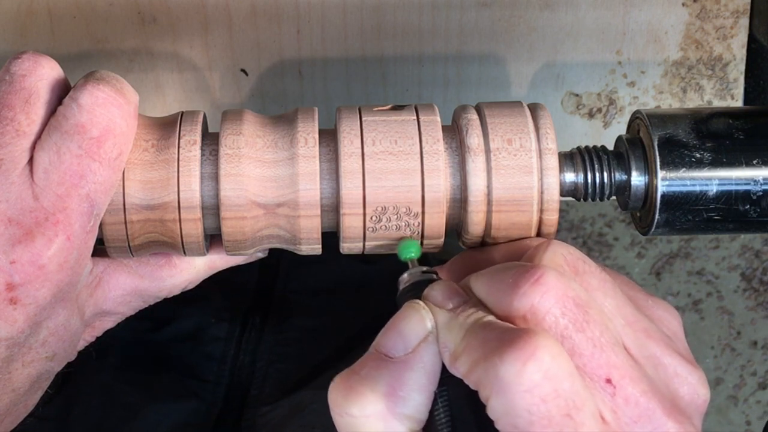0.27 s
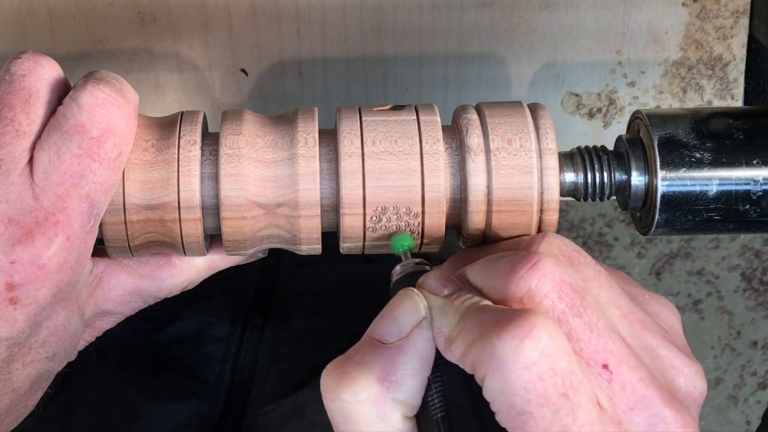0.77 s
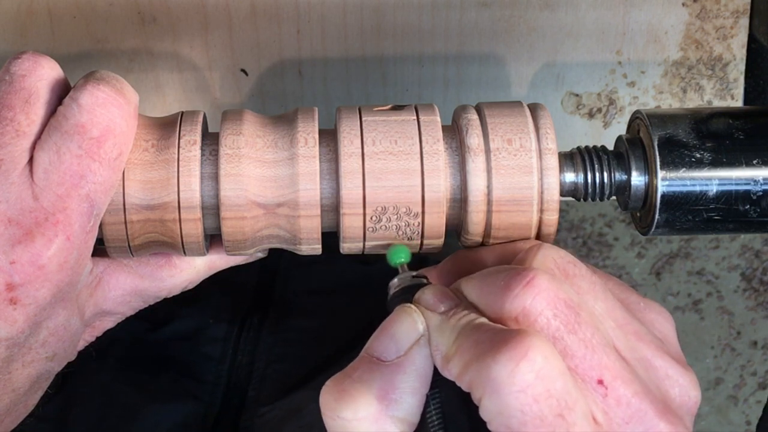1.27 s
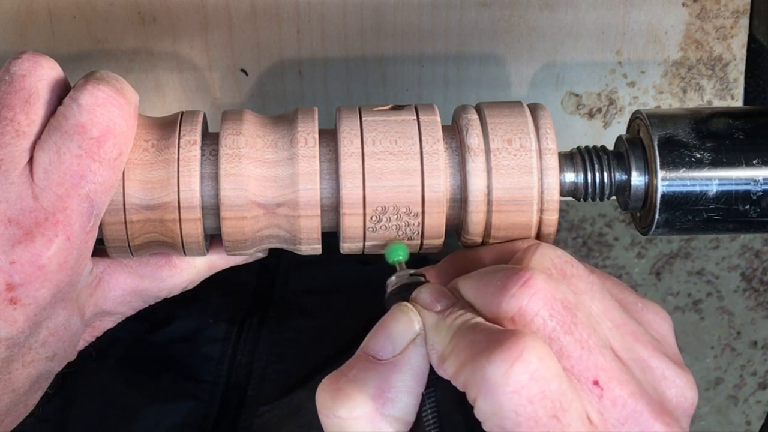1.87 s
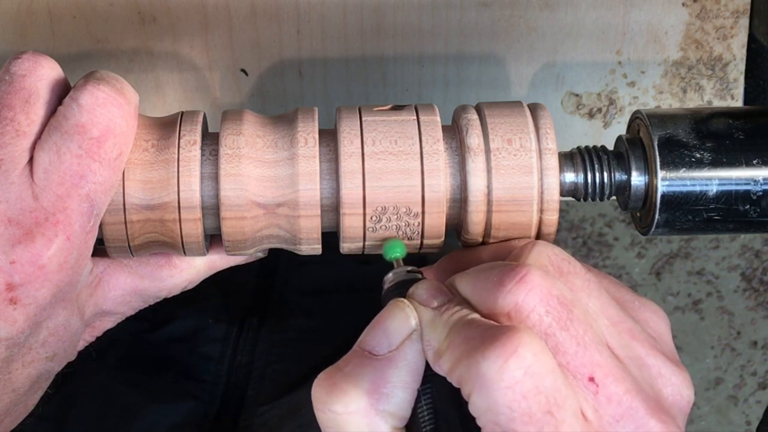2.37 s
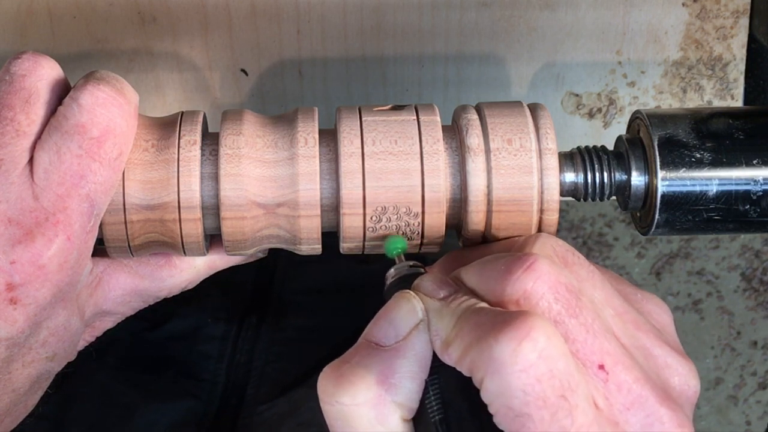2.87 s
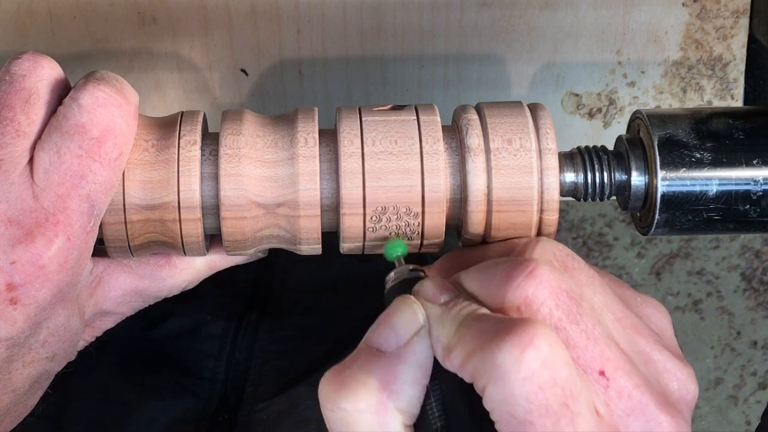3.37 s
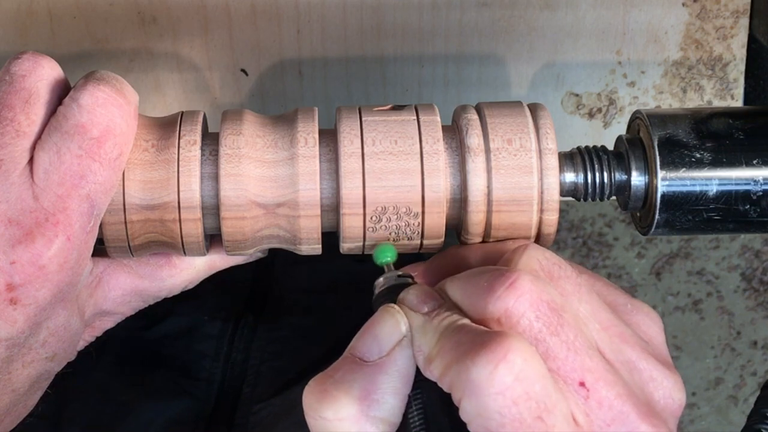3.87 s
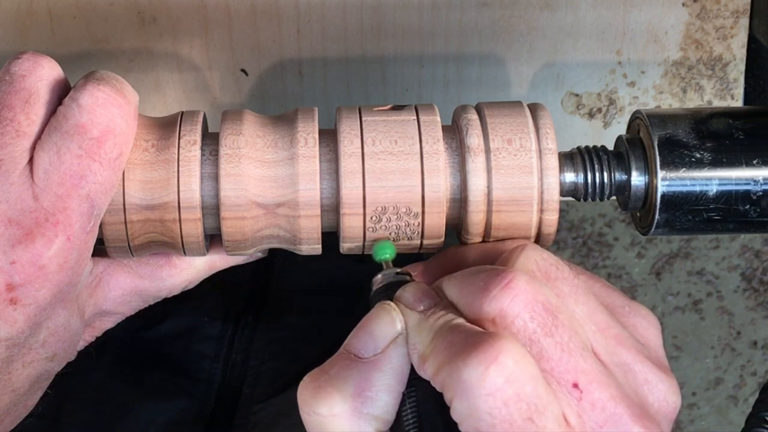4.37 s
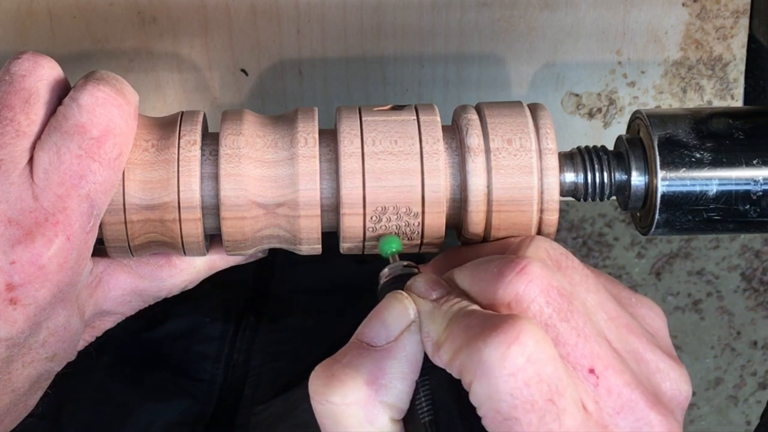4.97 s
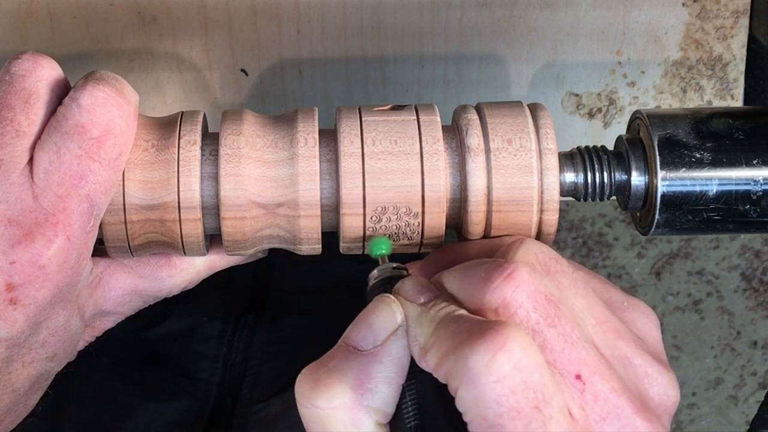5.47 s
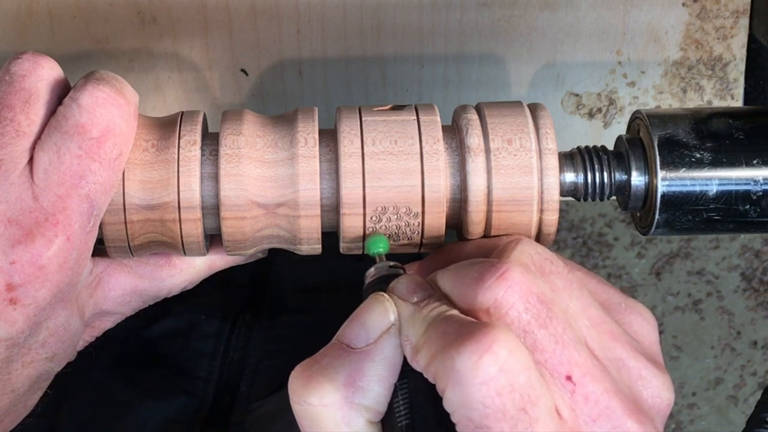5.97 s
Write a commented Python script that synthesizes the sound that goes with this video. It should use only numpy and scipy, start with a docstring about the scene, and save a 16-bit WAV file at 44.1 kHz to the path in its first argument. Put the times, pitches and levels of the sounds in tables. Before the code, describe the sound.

A small rotary carving tool whines at high speed, dipping in pitch and rasping each time it presses into wood.

```python
"""Rotary burr on wood

A flex-shaft tool spins a ball burr at about 39000 rpm in a workshop. Seven times it is pressed into
turned wood: drag slows the shaft, the burr chatters and rasps, and the speed recovers. Shaft harmonics
and inharmonic bearing tones whine over the rush of the cable and the motor's air; the room hums faintly."""
import sys
import numpy as np
from scipy import signal
from scipy.fft import rfft, irfft, next_fast_len
from scipy.io import wavfile
from scipy.ndimage import map_coordinates

SR = 44100
rng = np.random.default_rng(int(sys.argv[2]) if len(sys.argv) > 2 else 0)


def output_pcm(signal):
    """Save a mono or channel-first signal as 16-bit PCM at the path in sys.argv[1].

    Samples are clipped to [-1, 1] before scaling.
    """
    pcm = np.clip(np.atleast_2d(signal).T, -1, 1) * 32767
    wavfile.write(sys.argv[1], SR, np.round(pcm).astype(np.int16))


N = 274743
TIME = np.arange(N) / SR

# Presses into the wood; drag is the steady loss of speed, and a rise power under 1 is abrupt.
# touch_s, lift_s, peak_drag_hz, rise_power, chatter_db, rebound_db
PRESSES = [(0.005, 0.163, 101.9, 0.15, 5.5, -2), (0.735, 0.996, 156.9, 1.42, 10.5, 11.5),
           (2.279, 2.489, 137.8, 0.7, 5.5, 6), (2.955, 3.234, 154.1, 1.55, 14.5, 9),
           (4.153, 4.476, 136.7, 1.31, -3, 0), (4.899, 5.159, 152.9, 1.38, 6, 10.5),
           (5.779, 6.029, 169.1, 1.19, 3.5, 12)]
FREE_HZ, START_HZ, FULL_DRAG_HZ = 652.5, 639, 110


def shaft(inertia_s=0.1718, release_s=0.038):
    """Rotational inertia: speed follows drag with a first-order lag. Load is 0 in air, 1 in a full cut."""
    drag = np.zeros(N)
    for touch_s, lift_s, peak_hz, power, *_ in PRESSES:
        rise = np.clip((TIME - touch_s) / (lift_s - touch_s), 0, 1) ** power
        drag += peak_hz * rise * np.exp(-np.maximum(TIME - lift_s, 0) / release_s)
    pole = np.exp(-1 / (SR * inertia_s))
    speed = FREE_HZ - signal.lfilter([1 - pole], [1, -pole], drag, zi=[FREE_HZ - START_HZ])[0]
    flutter = 0.28 * wobble(60) + 0.201 * wobble(7)  # the cable winds and unwinds slightly
    angle = 2 * np.pi * np.cumsum(speed + flutter) / SR
    return speed, angle, np.clip(drag / FULL_DRAG_HZ, 0, 1)


# Skips of the burr around each lift: offset_s
SKIPS = [-0.051, .016, 0.0595]


def burr(speed, angle, load, air_db=-36.5, pinned_db=-5.5, skip_db=-10):
    """Rotating imbalance: the off-centre burr drones; wood pins it, and it rebounds and skips on lifting."""
    db = air_db + 35 * np.log10(speed / FREE_HZ) + pinned_db * load
    for _, lift_s, *_, rebound_db in PRESSES:
        db += rebound_db * bump(lift_s, 0.032)
        db += skip_db * sum(bump(lift_s + offset_s, 0.0082) for offset_s in SKIPS)
    bounce = 1 + load * 0.42 * wobble(65)
    slip = load * 0.46 * wobble(60)
    return amp(db + 0.22 * wobble(5.1)) * bounce * tone(angle + slip)


# Shaft harmonics; an order is a multiple of the speed, and the seventh comes from the fan's blades.
# order, relative_level_db, cut_gain_db, graze_gain_db
HARMONICS = [(2, -54.5, 10.5, -1), (3, -44, 8, 3.5), (4, -48, 0, 2), (5, -55.5, 13.5, 2),
             (6, -43.5, 6.5, 5), (7, -38.0, 5, -0.3), (8, -51.5, 8.5, 5), (9, -49, 3.4, 5.4),
             (10, -42, 1.5, 1.5), (11, -51.5, 6, 3), (14, -45.7, 0.5, 2.5), (15, -59.5, 7.6, 3),
             (16, -57, 6, 2.0), (20, -55, -3.6, 2.3), (21, -54.2, 3, 4), (22, -60, 0, 1)]
# Squeals, swells and fades of single harmonics: centre_s, order, gain_db, half_length_s
FLARES = [(0.181, 6, 8, 0.027), (0.185, 2, 10, 0.044), (0.6, 14, -6, 0.14), (0.684, 10, 8, 0.29),
          (0.92, 7, 6.5, 0.037), (1.762, 14, -8, 0.15), (1.833, 3, -23, 0.41), (2.264, 6, 9.5, 0.038),
          (2.52, 4, 3, 0.044), (3.02, 10, 7, 0.21), (3.1, 5, 9, 0.033), (3.204, 7, 5.5, 0.038),
          (3.725, 20, 6, 0.31), (3.86, 10, -12, 0.38), (4.253, 4, 9.5, 0.048), (4.35, 14, 6.5, 0.05),
          (4.42, 10, 7, 0.042), (4.49, 16, 8, 0.05), (4.5, 4, 6.5, 0.051), (4.992, 3, 13, 0.052),
          (5.021, 5, 13, 0.038), (5.067, 8, 9.5, 0.08), (5.076, 10, 12, 0.033), (5.089, 15, 8, 0.07),
          (5.116, 9, 12.5, 0.07)]


def harmonics(speed, angle, load, base_db=-1.1):
    """Periodic forcing: whole multiples of the speed sound, most rising as the teeth graze and cut."""
    graze = sum(bump(touch_s + 0.022, 0.048) for touch_s, *_ in PRESSES)
    # Shortly before each lift the burr chatters twice a turn.
    chatter = [(lift_s - 0.07, 2, db, 0.035) for _, lift_s, _, _, db, _ in PRESSES]
    flares = [*FLARES, *chatter]
    out = np.zeros(N)
    for order, free_db, cut_db, graze_db in HARMONICS:
        flare_db = sum(db * bump(centre_s, half_s) for centre_s, k, db, half_s in flares if k == order)
        level_db = base_db + free_db + cut_db * load + graze_db * graze + flare_db
        out += partial(order, level_db, speed, angle, load)
    return out


# Resonances of the handpiece: centre_hz, width_hz, gain_db
HANDPIECE_MODES = [(1190, 160, 7.3), (2334, 54, 6.5), (2559, 140, 6.5), (3220, 78, 7.5), (4250, 184, -7),
                   (4456, 54, 2), (6250, 118, -4), (8310, 1770, 15), (8970, 280, -7), (9410, 210, 5.5)]


def partial(order, db, speed, angle, load, flicker_db=1.4):
    """Forced resonance: a tone swells and dips as it glides through the handpiece's response."""
    level_db = db + resonance_db(HANDPIECE_MODES, order * speed) + flicker_db * wobble(14)
    ragged_db = load * (2.5 * wobble(75) + 1.3 * wobble(35))
    jitter = 0.034 * order * wobble(140)  # shaft jitter blurs the high orders most
    return amp(level_db + ragged_db) * tone(order * angle + jitter)


# Envelope of the bearing's leading tone: time_s, level_db
WHINE_LEVELS = [(0, -39), (.18, -50), (.28, -34), (.46, -38), (.68, -31), (.92, -43), (1.2, -35),
                (1.75, -36.5), (1.95, -31), (2.27, -33.5), (2.75, -41), (3.3, -38), (3.48, -35.5),
                (4.7, -43.5), (5.2, -42), (5.38, -33.5), (5.8, -48), (5.96, -38), (6.22, -46)]


def bearing_whine(angle, order=10.578):
    """Rolling contact: the bearing sings unevenly at a non-integer multiple of the speed."""
    db = np.interp(TIME, *np.transpose(WHINE_LEVELS))
    return amp(db + 0.86 * wobble(9) + 0.37 * wobble(35)) * tone(order * angle + 0.085 * wobble(90))


# Further tones of the bearing balls: order
BALL_ORDERS = [5.078, 5.906, 11.406, 12.578, 16.07, 16.898, 21.57, 22.398, 22.812]
# Strength of each of those tones: relative_level_db
BALL_LEVELS = [-53.5, -49, -52, -58, -51.5, -49.5, -48, -49, -50]


def bearing_rattle(speed, angle, load, flaw_tones=20):
    """Inharmonic vibration: the balls ring, and flaws in the races scatter fleeting tones among them."""
    balls = sum(partial(order, db - 2.5, speed, angle, load, flicker_db=3.5)
                for order, db in zip(BALL_ORDERS, BALL_LEVELS))
    flaws = sum(amp(-59 + 5 * wobble(11)) * tone(order * angle)
                for order in rng.uniform(9, 23, flaw_tones))
    return balls + flaws


# Spectrum of the cable and cooling air: frequency_hz, relative_density_db
RUSH_SPECTRUM = [(250, -25.5), (600, -19), (900, -10), (1400, -5.5), (1900, -4.5), (3100, -5), (4900, -5.5),
                 (6000, 1.5), (7600, -2), (8900, 0), (10300, -10), (12000, -6), (14000, -7), (15700, -12.5)]
# Resonances of the cable's sheath: centre_hz, width_hz, gain_db
SHEATH_MODES = [(1744, 130, 6.5), (2110, 380, 12), (2560, 180, 5.5), (3440, 640, 4.5), (3994, 380, 8),
                (5800, 510, 0.5), (6500, 500, -0.5)]


def cable_and_air(speed, angle):
    """Friction and flow noise: both grow with speed, and the cable rubs its sheath harder once a turn."""
    db = -31.5 + 45 * np.log10(speed / speed.max()) + 0.34 * wobble(7.4) + 0.79 * wobble(250)
    return amp(db) * noise(RUSH_SPECTRUM, SHEATH_MODES) * unit(1 + 0.25 * np.sin(angle))


# Spectrum of the cut: frequency_hz, relative_density_db
RASP_SPECTRUM = [(300, -20), (1000, -10.5), (2200, -16), (3900, -0.5), (5000, -12), (6200, -0.5),
                 (7600, -1.5), (8600, -8), (9500, -1.5), (10600, -13), (13200, -4), (15700, -6)]


def rasp(angle, load, full_cut_db=-33):
    """Amplitude-modulated noise: the teeth tear off fibres once a turn, in uneven bites."""
    tearing = noise(RASP_SPECTRUM)
    bites = unit(amp(3.3 * np.sin(angle) + 0.95 * wobble(400) + 2.8 * wobble(50)))
    return amp(full_cut_db) * load * tearing * bites


# Tones of the teeth entering the wood: order
TOOTH_ORDERS = [22, 23, 24]


def whistles(speed, angle, load, delay_s=0.12):
    """Pitch follows rotation: the teeth whistle briefly on entry, falling as the shaft slows."""
    entry = sum(bump(touch_s + delay_s, 0.064) for touch_s, *_ in PRESSES)
    return entry * sum(partial(order, -47, speed, angle, load, flicker_db=3) for order in TOOTH_ORDERS)


# Catches of the burr in the grain: start_s, level_db
CATCHES = [(1.005, -45), (2.529, -36.5), (6.058, -33)]
# Modes of the wooden piece: pitch_hz, relative_level_db, t60_s
WOOD_MODES = [(480.3, -6.5, 0.13), (539, 1.5, 0.1), (1098, 3, 0.084)]


def knocks(attack_s=0.004):
    """Damped free vibration: each catch jolts the wood, whose modes decay exponentially."""
    out = np.zeros(N)
    for start_s, level_db in CATCHES:
        age = np.maximum(TIME - start_s, 0)
        ring = sum(amp(db - 60 * age / t60) * tone(2 * np.pi * hz * age) for hz, db, t60 in WOOD_MODES)
        out += amp(level_db) * ring * (1 - np.exp(-age / attack_s))
    return out


def walls(sound, t60_s=0.22, gap_s=0.004, low_cut_hz=1100):
    """Reverberation: a short diffuse tail of reflections smears the gliding partials."""
    t = np.arange(SR // 3) / SR
    tail = rng.standard_normal(len(t)) * amp(-60 * t / t60_s) * (t > gap_s)
    treble = filtered(sound, lambda hz: hz ** 2 / (hz ** 2 + low_cut_hz ** 2))
    return signal.fftconvolve(treble, tail / np.linalg.norm(tail))[:N]


# Tones of the room's hum: pitch_hz, level_db
HUM_TONES = [(56.5, -65), (102, -62), (175, -72)]
# Spectrum of the room's rumble: frequency_hz, relative_density_db
RUMBLE_SPECTRUM = [(20, -29), (38, -26), (50, 2), (60, -8.5), (78, -4.5), (100, -6.5), (135, -16.5),
                   (220, -25.5), (400, -21.5), (1000, -46)]


def workshop(rumble_db=-59):
    """Ambient noise floor: wavering hum tones stand over a low continuous spectrum."""
    hum = sum(amp(db + wobble(6.5)) * tone(2 * np.pi * hz * TIME + 0.57 * wobble(8))
              for hz, db in HUM_TONES)
    return hum + amp(rumble_db) * noise(RUMBLE_SPECTRUM)


def amp(db):
    """Decibels as an amplitude ratio."""
    return 10 ** (np.asarray(db) / 20)


def unit(x):
    """Normalisation to rms 1."""
    return x / np.sqrt(np.mean(x ** 2) + 1e-20)


def tone(phase):
    """A sinusoid of rms 1 with a random starting phase."""
    return np.sqrt(2) * np.sin(phase + rng.uniform(0, 2 * np.pi))


def bump(centre_s, half_s):
    """A Gaussian swell from 0 to 1 and back."""
    return np.exp(-((TIME - centre_s) / half_s) ** 2)


def wobble(rate_hz):
    """Smooth random modulation: a spline through rate_hz random values a second."""
    return map_coordinates(rng.standard_normal(int(N * rate_hz / SR) + 4), [TIME * rate_hz])


def filtered(x, response):
    """Zero-phase filtering: the spectrum times a frequency response."""
    size = next_fast_len(N + 8192)
    return irfft(rfft(x, size) * response(np.fft.rfftfreq(size, 1 / SR)), size)[..., :N]


def resonance_db(modes, hz):
    """The summed gain of Lorentzian peaks and dips."""
    return sum(db / (1 + (2 * (hz - centre) / width) ** 2) for centre, width, db in modes)


def noise(spectrum, modes=()):
    """Source and filter: white noise shaped by a broad spectrum and resonances, at rms 1."""
    knots_hz, knots_db = np.transpose(spectrum)

    def response(hz):
        return amp(np.interp(np.log(hz + 1), np.log(knots_hz), knots_db) + resonance_db(modes, hz))

    return unit(filtered(rng.standard_normal(N), response))


def scene():
    """Superposition: tool, reflections and room add, alike in both channels."""
    speed, angle, load = shaft()
    tool = burr(speed, angle, load) + bearing_whine(angle) + harmonics(speed, angle, load)
    tool += bearing_rattle(speed, angle, load) + cable_and_air(speed, angle)
    tool += rasp(angle, load) + whistles(speed, angle, load) + knocks()
    mix = tool + amp(-10.5) * walls(tool) + workshop()
    return np.array([mix, mix])


def record(dry, cutoff_hz=15750):
    """Band limiting: an ideal low-pass filter removes the highest treble."""
    return filtered(dry, lambda hz: hz < cutoff_hz)


dry = scene()
out = record(dry)
output_pcm(out)
```